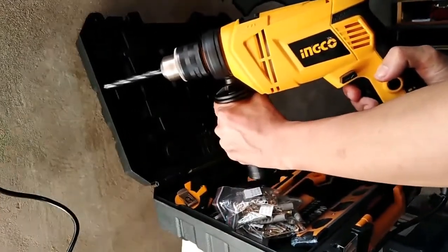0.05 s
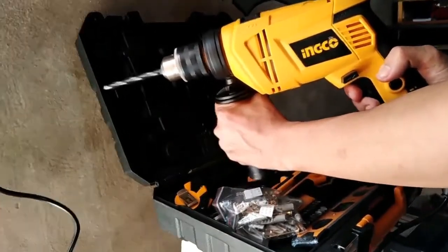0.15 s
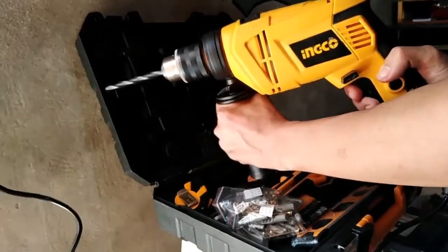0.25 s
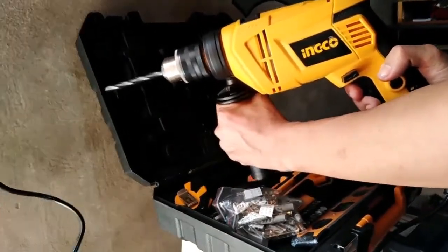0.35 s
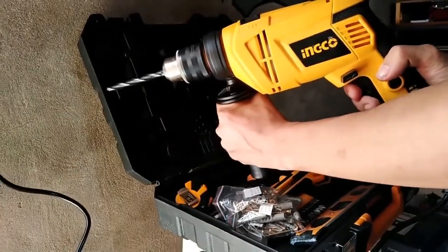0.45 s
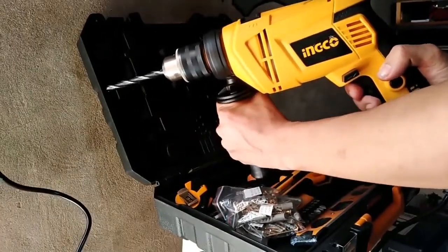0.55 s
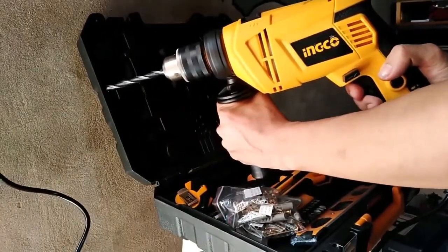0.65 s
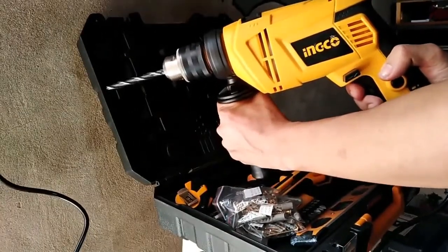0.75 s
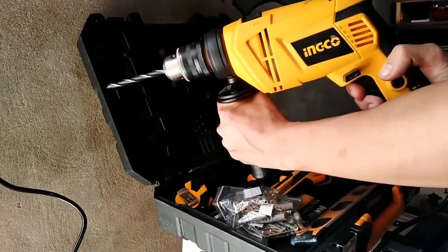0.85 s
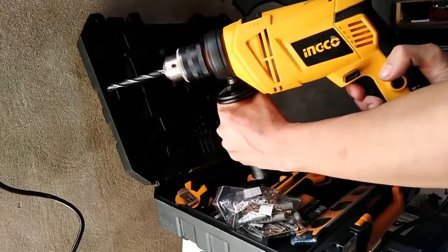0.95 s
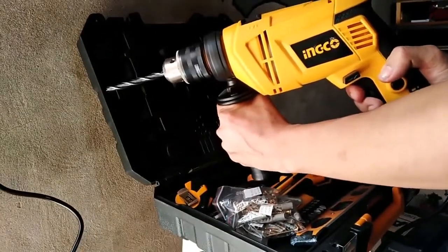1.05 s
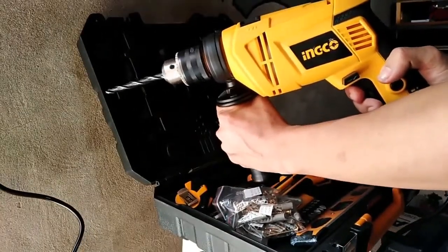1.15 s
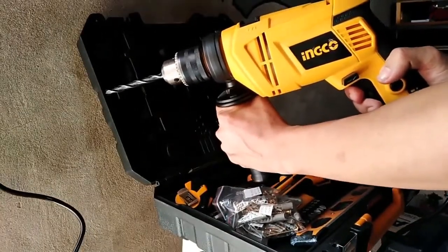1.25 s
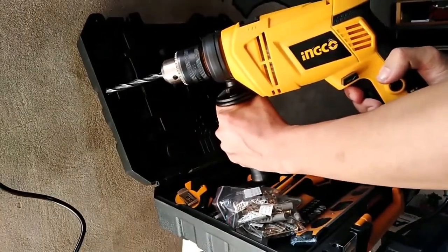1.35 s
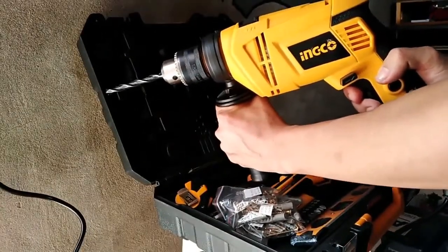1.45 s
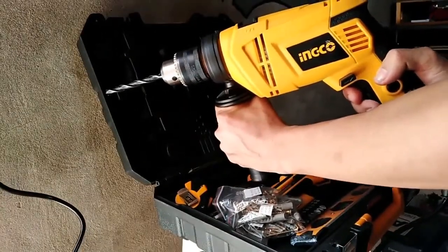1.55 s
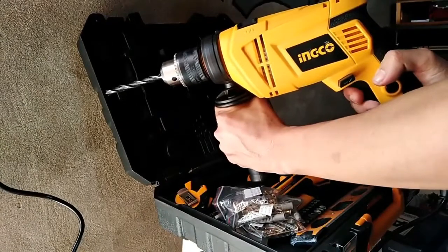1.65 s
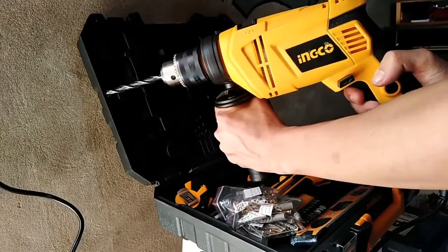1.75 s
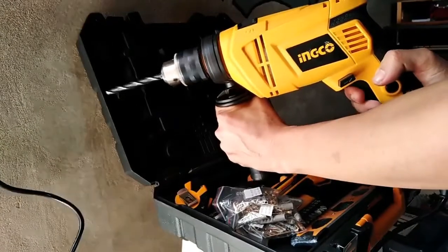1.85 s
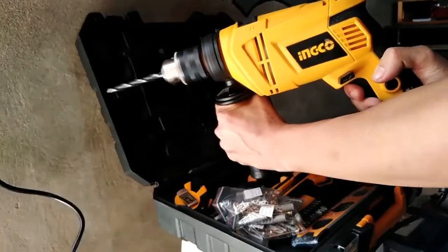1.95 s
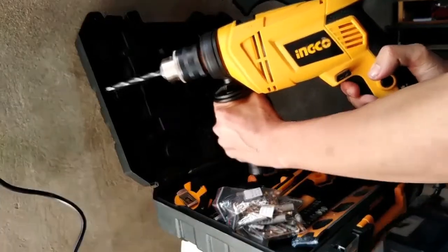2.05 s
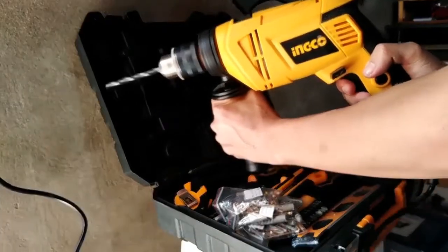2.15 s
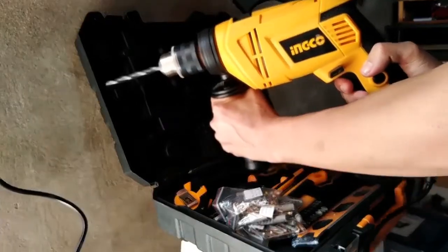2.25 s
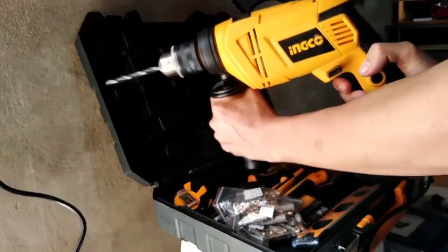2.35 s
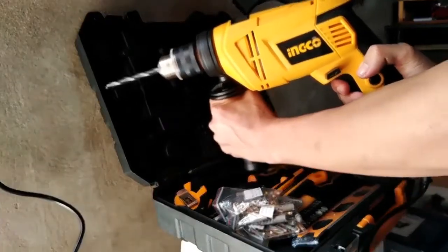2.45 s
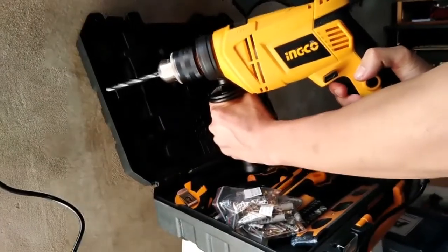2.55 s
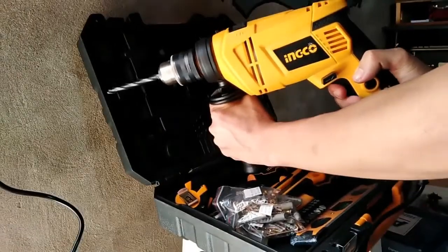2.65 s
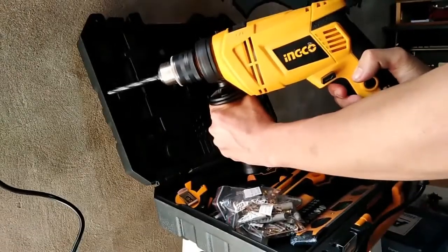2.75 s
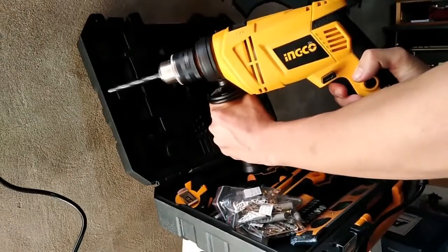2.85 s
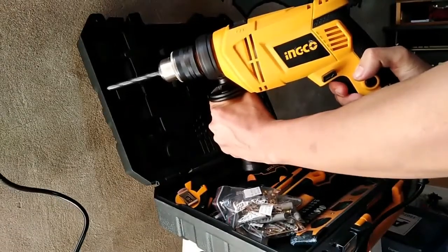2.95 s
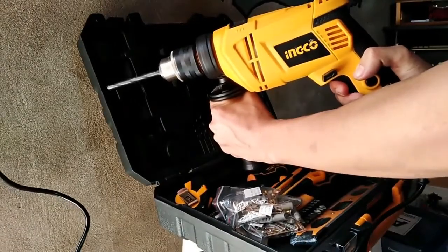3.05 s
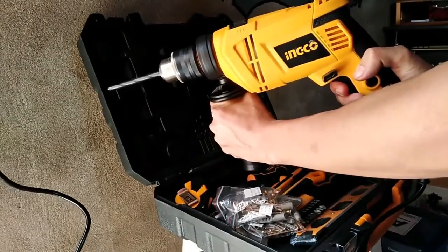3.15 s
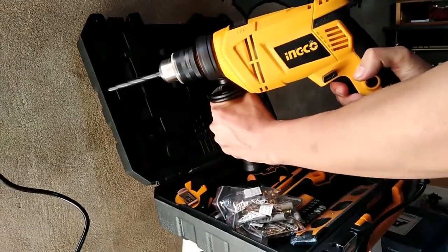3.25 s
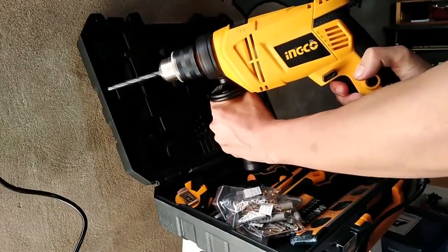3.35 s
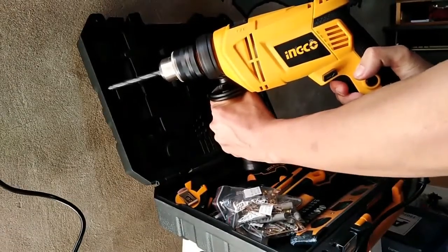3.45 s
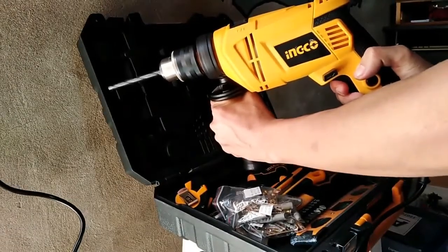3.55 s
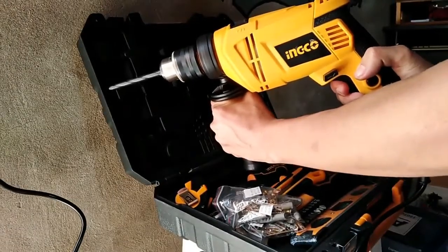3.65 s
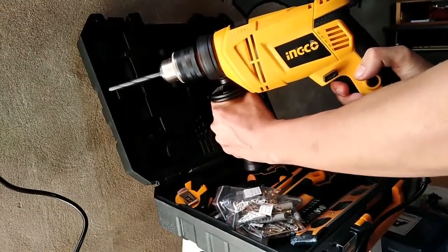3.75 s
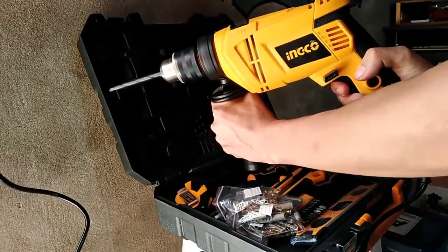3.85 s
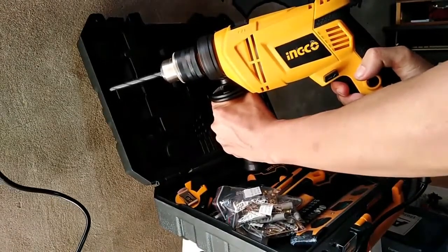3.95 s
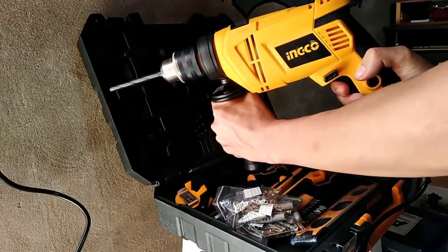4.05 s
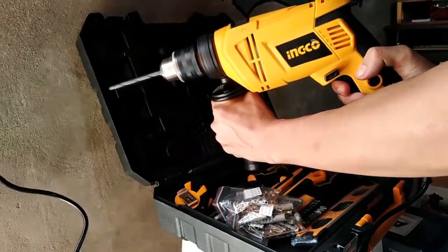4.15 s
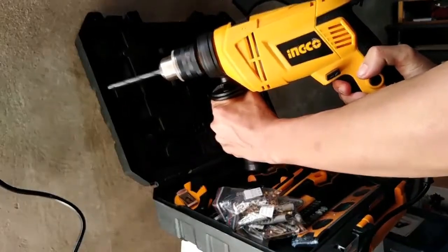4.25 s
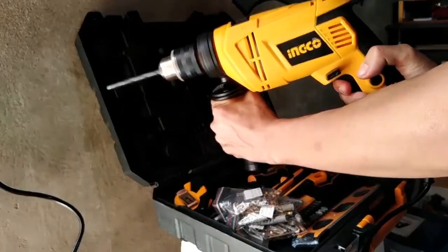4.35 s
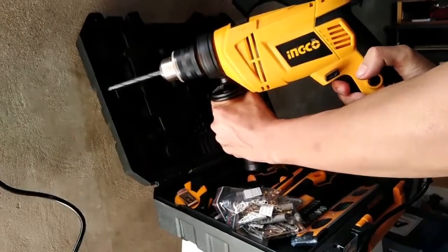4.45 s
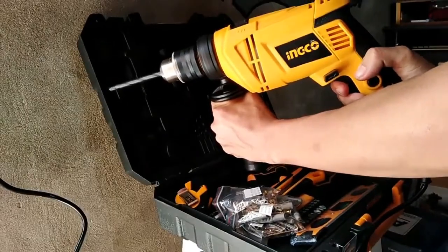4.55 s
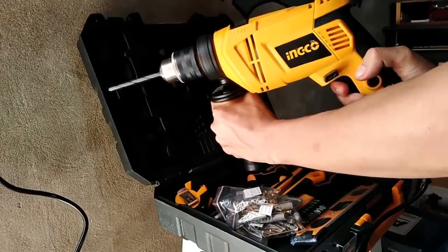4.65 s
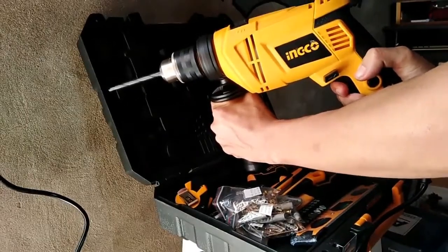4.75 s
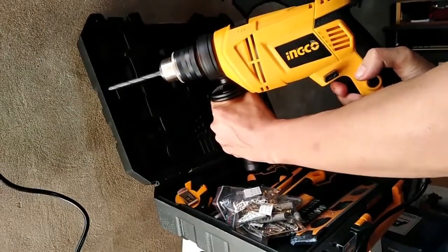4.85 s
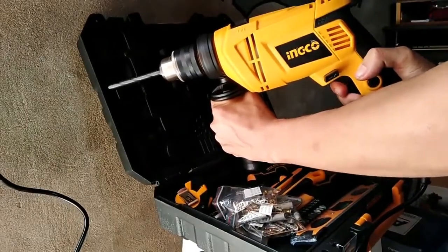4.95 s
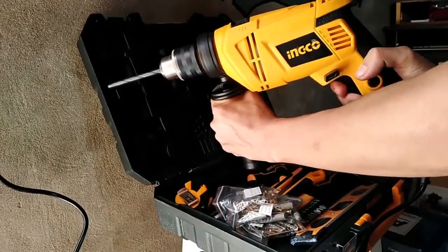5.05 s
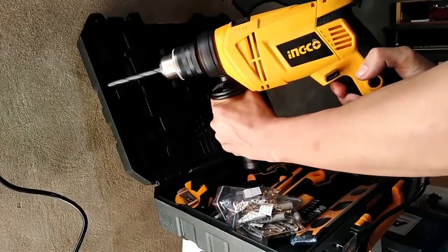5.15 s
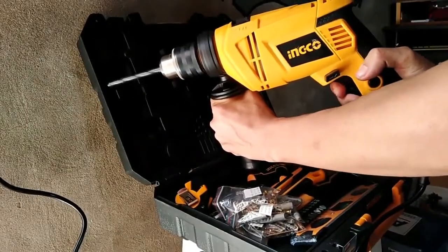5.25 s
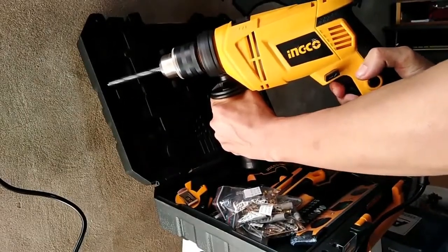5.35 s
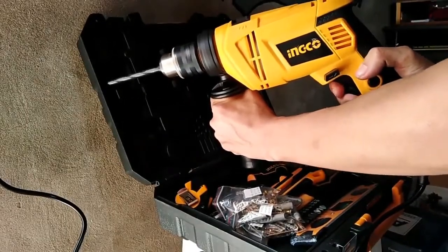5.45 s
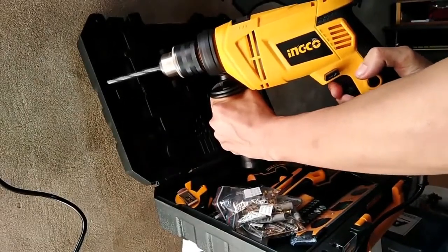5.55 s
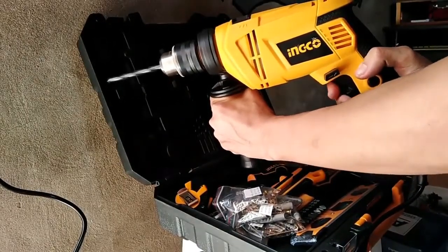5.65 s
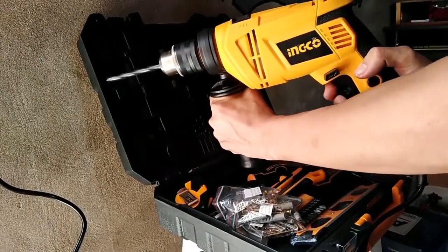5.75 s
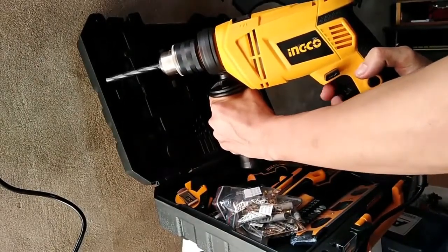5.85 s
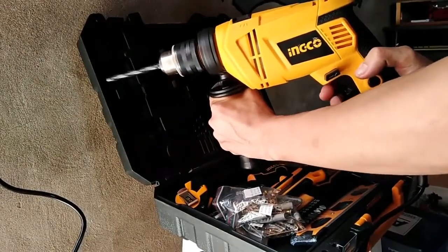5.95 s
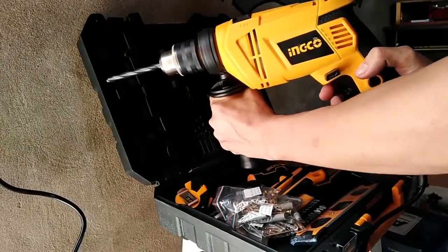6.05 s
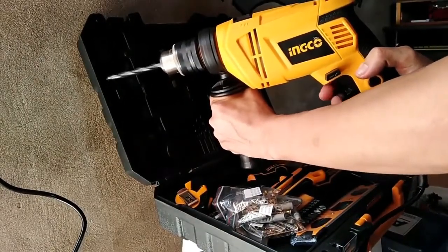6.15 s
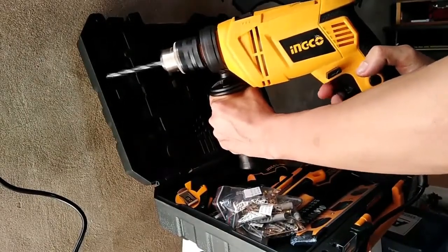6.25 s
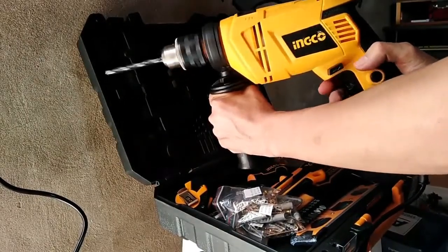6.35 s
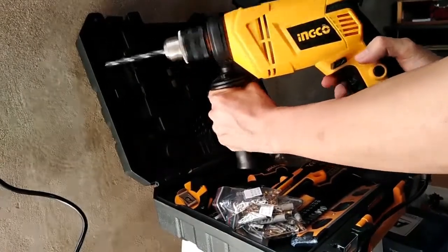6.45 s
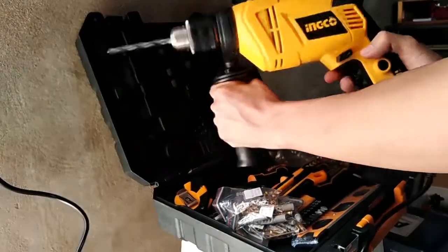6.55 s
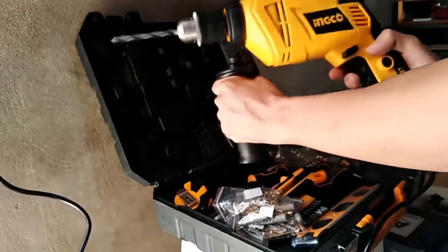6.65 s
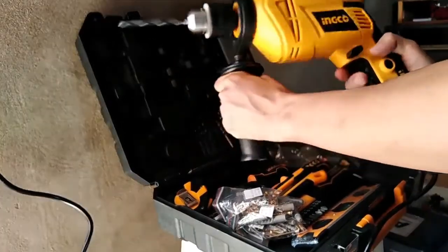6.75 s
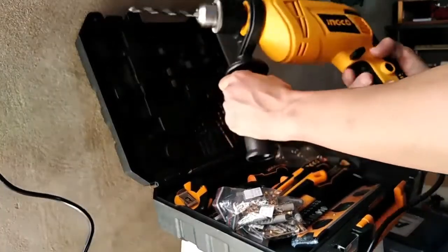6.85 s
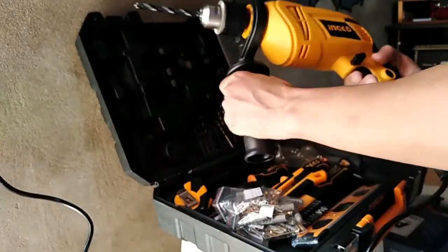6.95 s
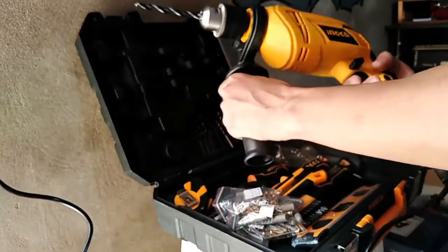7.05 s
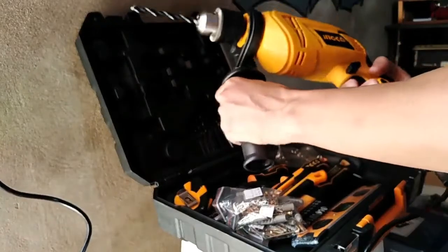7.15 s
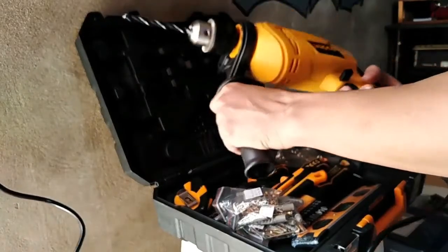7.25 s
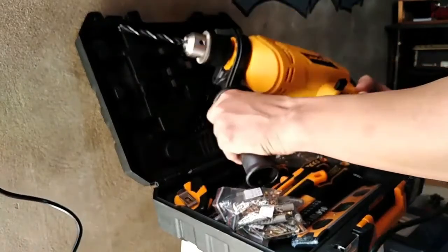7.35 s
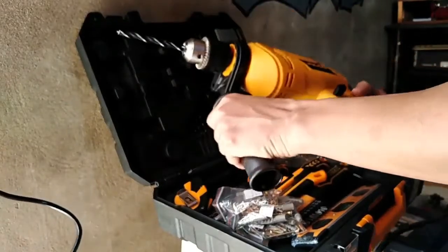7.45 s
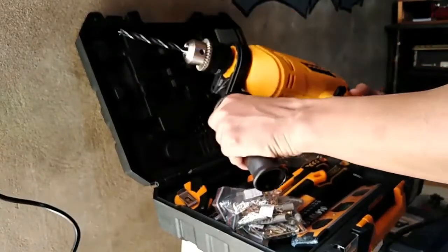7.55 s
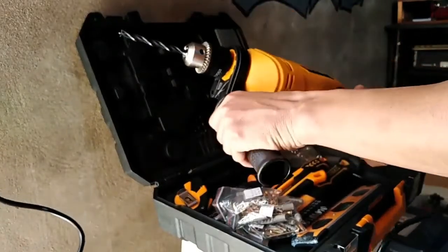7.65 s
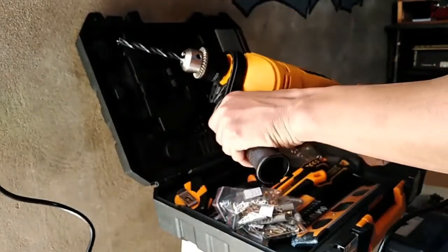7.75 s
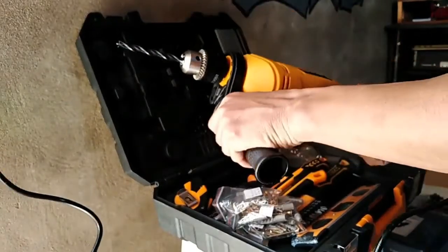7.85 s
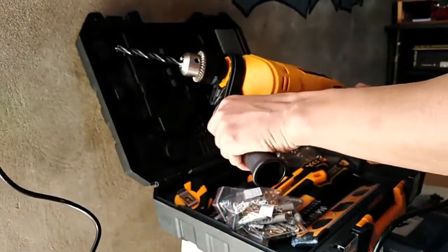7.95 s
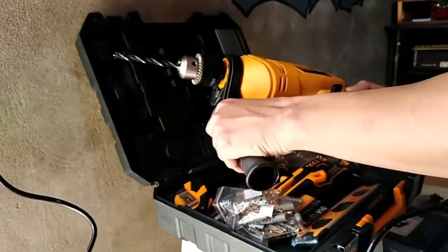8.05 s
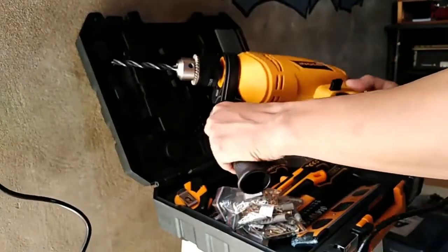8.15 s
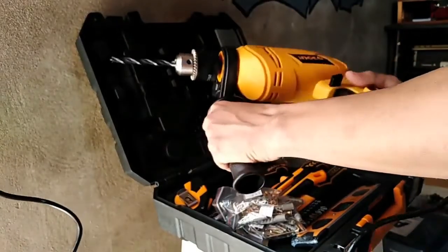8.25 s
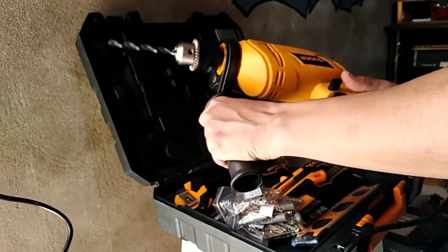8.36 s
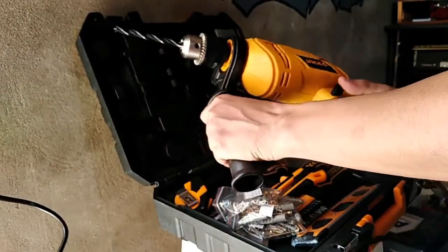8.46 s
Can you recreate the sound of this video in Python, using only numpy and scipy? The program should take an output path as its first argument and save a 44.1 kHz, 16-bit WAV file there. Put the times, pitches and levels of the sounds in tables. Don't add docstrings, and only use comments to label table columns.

```python
import sys
import numpy as np
from scipy import signal
from scipy.fft import rfft, irfft, next_fast_len
from scipy.io import wavfile
from scipy.ndimage import uniform_filter1d, map_coordinates

SR = 44100
rng = np.random.default_rng(int(sys.argv[2]) if len(sys.argv) > 2 else 0)


def store_pcm(level_fs):
    pcm = np.round(np.clip(level_fs, -1, 1) * 32767).astype(np.int16)
    wavfile.write(sys.argv[1], SR, np.atleast_2d(pcm).T)


def gain_from_decibels(decibels):
    exponent = np.asarray(decibels, float) / 20
    return 10 ** exponent


N = 375732
TIME = np.arange(N) / SR

# start_s, start_hz, goal_hz, time_constant_s, curve_shape
TRIGGER = [
    (0, 193.07, -264.5, 2.4745, 1),
    (1.66, 8, 14, .1, 1),
    (1.79, 13.1, 201, .4464, 1),
    (2.7, 181.65, 438.05, .2172, .8034),
    (5.093, 437.9, -186.9, 2.1266, 1),
]
# time_s, depth (0-1)
HALF_WAVE = [
    (1.65, 0.8),
    (1.8, 0.8),
    (2.0, 0.21),
    (2.6, .12),
    (2.72, 0),
]
# time_s, added_db
BRUSH_CURRENT = [(1.655, 1), (1.66, 7), (1.696, 7), (1.702, 19.5), (1.8, 15.5), (1.9, 6.5), (2.1, 5.5),
                 (2.25, 9.5), (2.45, 7.5), (2.64, 8.5), (2.72, 11.5), (3.0, 7), (3.6, 6), (4.3, 3),
                 (5.08, 1.5), (5.14, 0)]
# speed_hz, hiss_db, gear_db, unbalance_db
COASTING = [(0, -100, -100, -110), (8, -76, -75, -100), (20, -62, -63, -95), (40, -51, -57, -90),
            (70, -41, -52.5, -81), (105, -36.5, -46, -62), (143, -33.5, -42, -68), (192, -28, -35, -48),
            (270, -20, -30.5, -38.5), (360.6, -16, -29.5, -42), (437, -15, -28.5, -39)]
# speed_hz, fan_db, fan_octave_db, commutator_db, overtones_db
TONES = [(10, -100, -100, -85, -83.5), (65, -70, -71, -56, -54), (85, -67, -68, -43, -47),
         (105, -67, -62, -41, -41), (130, -66, -54, -35.5, -39.5), (160, -66.5, -48, -35, -39),
         (195, -57, -37.5, -35.5, -36.5), (225, -55, -26, -45, -44), (265, -36, -27.5, -42, -44),
         (315, -33.5, -28, -50, -50), (355, -20.5, -32, -44, -44), (400, -16.5, -33, -46, -46),
         (438, -19.5, -36, -43, -43)]
TONE_LOAD = (.2, .2, .9, 0.91)
# shaft_multiple, level_db
BARS = [(23, -12), (24, -1), (25, -12), (45, -10), (46, -7), (47, -3), (48, -1), (49, -8), (69, -11),
        (70, -8), (71, -8), (72, -7), (96, -13)]
# centre_hz, width_hz, lift_db
PORTS = [(8396, 1280, 12.5), (6956, 820, 14)]
# freq_hz, density_db
HISS = [(500, -37.5), (2000, -17), (4000, 1), (6000, 2.5), (9000, -2), (11000, -4), (14000, -8),
        (16000, -3.5)]
# freq_hz, density_db
GEARS = [(180, -28.5), (300, -6.5), (323, -8.5), (426, -6), (508, -5.5), (999, 0), (1870, 2), (3370, 2.5),
         (4070, -5.5), (6000, -13.5), (7800, -34.5), (13200, -120)]
# freq_hz, density_db
BACKLASH = [(500, -12), (800, -4), (1100, -1), (1500, 1), (2000, -4.5), (2900, -3.5), (3700, -16)]
# freq_hz, density_db
CHUCK = [(740, -30), (785, -6), (800, 3), (815, -8), (860, -30)]
# freq_hz, density_db
COIL = [(300, -24), (430, -3), (520, 0), (650, -8.5), (900, -26)]
# freq_hz, density_db
AIR = [(15, -63), (25, -24), (279, -6), (361, -17), (432, -9), (509, -8), (900, -16.5), (1170, -41),
       (1980, -120)]
# freq_hz, gain_db
CASING = [(40, -24), (120, -7), (200, 0), (1200, -6), (1800, -8), (2050, 1), (2480, 6), (2800, -1),
          (3400, -4), (4600, -10), (6000, -1), (9500, -3), (11500, 1), (14000, 3)]
# freq_hz, t60_s
WALLS = [(100, 0.36), (1000, .16), (6000, .2), (15000, 0.065)]
# pitch_hz, level_db
HUMS = [(64.6, -73), (183.0, -75), (220.7, -74), (279.9, -77.5)]
# start_s, attack_s, hold_s, release_20db_s, level_db
LOW_SURGE = (3, 0.2, .75, 0.03, -44.5)
# freq_hz, density_db
OUTDOORS = [(18, -62), (30, -32), (53, -15), (219, -3.5), (285, -6), (310, -29.5), (388, -14.5), (549, -46),
            (660, -34), (1690, -68), (4000, -47), (5200, -73.5), (8800, -120)]
# nearest_s, width_s, level_db
PASSING = (8.1, 0.14, -62)
# start_s, length_s, start_hz, end_hz, level_db
CHIRPS = [
    (1.325, 0.22, 5500, 5430, -66),
    (1.5, 0.18, 5200, 6100, -68),
    (7.548, .3, 5810, 5400, -71),
    (7.9, 0.15, 5600, 3800, -72),
    (7.93, .2, 7500, 7000, -81),
    (8.0, .3, 4400, 3310, -76),
    (8.21, .15, 7600, 7400, -71),
    (8.31, 0.25, 6100, 5240, -65),
]
# start_s, peak_db, ring_hz, tick_db
KNOCKS = [(1.662, -61, 3210, 9), (1.681, -57, 544, 15), (1.703, -39, 1530, -1), (1.721, -46, 501, -8),
          (1.739, -35, 1520, -17), (1.761, -49, 3090, -11), (1.779, -50, 3090, -11),
          (1.841, -28, 1190, -14), (1.859, -32, 1600, -14.5), (1.866, -32, 3060, -15),
          (1.885, -26, 2600, -12), (1.998, -24, 2980, -12), (2.202, -20, 3150, -14),
          (2.296, -18.5, 1600, -10), (2.527, -15.5, 1580, -5), (7.668, -61, 627, -14),
          (8.461, -41, 2510, -0.5), (8.464, -51, 2550, 0.5), (8.479, -40.5, 2200, 3.5),
          (8.488, -54, 2020, -10)]
# freq_hz, density_db
FLOOR = [(300, -18), (450, -1), (800, -10), (1350, -13), (1700, -26.5), (3500, -24), (5200, -14),
         (7500, -20), (10000, -25)]
# time_s, overflow_level (full scale near 1
HEADROOM = [(2.6, .5), (3.1, .6), (3.6, .6), (3.86, .6), (3.92, .8), (4.22, .8), (4.3, 1.5)]
# freq_hz, limit_db
STARVED = [(2300, -30), (2800, -13), (3800, -12), (4700, -9.5), (5300, -30), (9800, -21), (11000, -15.5),
           (12000, -16), (14000, -18), (16000, -22)]

BLADES, MAINS_HZ, TOP_HZ = 18, 50, 15750


def unit(x):
    return x / np.sqrt(np.mean(x ** 2) + 1e-20)


def curves(rows):
    s, *cols = np.transpose(rows)
    return [np.interp(TIME, s, c) for c in cols]


def by_speed(rows, speed_hz):
    hz, *cols = np.transpose(rows)
    return [np.interp(speed_hz, hz, c) for c in cols]


def wobble(rate_hz):
    knots = rng.standard_normal((2, N // 100))
    return np.array([map_coordinates(k, [TIME * rate_hz], order=3) for k in knots])


def pair(alike):
    a, b = rng.standard_normal((2, N))
    turn = np.arccos(np.clip(alike, 0, 1)) / 2
    return np.cos(turn) * a + np.sin(turn) * b * [[1], [-1]]


def filtered(x, response):
    m = next_fast_len(N + 8192)
    return irfft(rfft(x, m) * response(np.fft.rfftfreq(m, 1 / SR)), m)[..., :N]


def colour(points):
    f, db = np.transpose(points)
    return lambda hz: gain_from_decibels(np.interp(np.log(hz + 1), np.log(f), db, -120, -120))


def patchy(x, patchy_db):
    z = signal.stft(x, nperseg=512)[2]
    field = uniform_filter1d(rng.standard_normal(z.shape), size=4, axis=1)
    field = uniform_filter1d(field, size=12, axis=2)
    return unit(signal.istft(z * gain_from_decibels(patchy_db * unit(field)), nperseg=512)[1][:, :N])


def ports(hz):
    return np.array([1 + gain_from_decibels(db) * 1j * hz * w / (c * c - hz * hz + 1j * hz * w) for c, w, db in PORTS])


def room(x, wet_db):
    hz, t, z = signal.stft(rng.standard_normal((2, SR // 2)), SR, nperseg=256)
    f, t60 = np.transpose(WALLS)
    decay = gain_from_decibels(-60 * t / np.interp(hz, f, t60)[:, None])
    tail = signal.istft(z * decay, SR, nperseg=256)[1]
    tail = tail / np.linalg.norm(tail, axis=1, keepdims=True)
    wet = signal.fftconvolve(np.pad(x, ((0, 0), (130, 0))), tail, axes=1)[:, :N]
    return (x + gain_from_decibels(wet_db) * wet) / np.sqrt(1 + gain_from_decibels(wet_db) ** 2)


def armature():
    finger_s = 0.04
    speed_hz = np.zeros(N)
    for s, start_hz, goal_hz, tau_s, shape in TRIGGER:
        run = goal_hz + (start_hz - goal_hz) * np.exp(-(np.clip(TIME - s, 0, None) / tau_s) ** shape)
        speed_hz = np.where(TIME >= s, np.maximum(run, 0), speed_hz)
    return uniform_filter1d(speed_hz, size=round(finger_s * SR), mode="nearest")


def tooth_contacts(speed_hz, spark_db):
    share, slow_share, slack_hz = 0.25, 0.32, 162
    rattle = share + slow_share * (spark_db > 0) * (speed_hz < slack_hz) + 0.18 * wobble(6)[0]
    hits = gain_from_decibels(4 * rng.exponential(size=N)) * (rng.random(N) < 0.02)
    hits = np.minimum(uniform_filter1d(hits, size=24), 0.4)
    return 1 + np.clip(rattle, 0, 1) * unit(hits)


def brush_hiss(angle, teeth):
    beat = 1 + 0.25 * np.cos(angle) + 0.3 * np.cos(24 * angle)
    scrape = unit(beat * teeth ** 0.54 * pair(0.24))
    hiss = unit(filtered(scrape, lambda hz: colour(HISS)(hz) * ports(hz)))
    return patchy(hiss, patchy_db=1.3)


def gear_noise(teeth):
    gears = unit(filtered(teeth * pair(0.7), colour(GEARS))) * gain_from_decibels(1.46 * wobble(12))
    return patchy(gears, patchy_db=2.5)


def gear_slack(speed_hz, spark_db, teeth):
    level = gain_from_decibels(-5 - 6 * spark_db + 2 * wobble(7)) * np.clip(speed_hz / 250, 0.7, 1)
    return level * unit(filtered(teeth * pair(0.6), colour(BACKLASH)))


def cooling_air():
    return unit(filtered(pair(0.22), colour(AIR))) * gain_from_decibels([[-1], [1]])


def shaft_tones(speed_hz, angle, spark_db, shake_db, gear_db):
    levels = by_speed(TONES, speed_hz)
    fan_db, octave_db, bar_db, upper_db = [db + share * spark_db for db, share in zip(levels, TONE_LOAD)]

    def tone(order, db, rough_db, rate_hz):
        port = ports(order * speed_hz)
        gain = abs(port) * colour(CASING + [(TOP_HZ, -40)])(order * speed_hz + 40)
        level = gain_from_decibels(db + rough_db * wobble(rate_hz)) * gain
        return level * np.sin(order * angle + np.angle(port) + rough_db / 4 * wobble(rate_hz))

    tones = tone(1, shake_db + 0.4 * spark_db + 2.5, 1.2, 20)
    tones += tone(4, gear_db - 17, 3, 60)
    tones += tone(BLADES, fan_db - 4.5, 0.96, 30)
    for side, db in [(-1, -9), (0, 0.5), (0.88, -2.5)]:
        tones += tone(2 * BLADES + side, octave_db + db - 3, 4, 160)
    for order, db in BARS:
        base_db = bar_db if order < 30 else upper_db
        tones += tone(order, base_db + db - 8 + 3 * wobble(11), 5, 170)
    return tones


def chuck_ring(speed_hz, spark_db, teeth):
    crawl_hz = 75
    level = gain_from_decibels(-13) * np.clip(1 - speed_hz / crawl_hz, 0, 0.5) * 2 * (spark_db < 1)
    return level * unit(filtered(teeth * pair(0.6), colour(CHUCK)))


def coil_buzz(depth, burst):
    return gain_from_decibels(1.5) * depth * burst * unit(filtered(pair(0.8), colour(COIL)))


def drill():
    speed_hz = armature()
    angle = 2 * np.pi * np.cumsum(speed_hz) / SR
    spark_db, = curves(BRUSH_CURRENT)
    hiss_db, gear_db, shake_db = by_speed(COASTING, speed_hz)
    hiss_db = hiss_db + spark_db
    gear_db = gear_db + 1.11 * spark_db + 0.8 * wobble(5)[0]
    air_db = -28.5 + 0.79 * (hiss_db - 0.8 * spark_db) + 3 * wobble(8)[0]
    teeth = tooth_contacts(speed_hz, spark_db)
    burst = np.exp(2.9 * (np.cos(2 * np.pi * MAINS_HZ * (TIME - 1.663)) - 1))
    depth = np.interp(TIME, *np.transpose(HALF_WAVE), 0, 0)
    feed = 1 + depth * (1.38 * burst - 0.7)

    gears = gear_noise(teeth) + gear_slack(speed_hz, spark_db, teeth)
    gears = gears + chuck_ring(speed_hz, spark_db, teeth) + coil_buzz(depth, burst)
    noise = gain_from_decibels(hiss_db - 0.95 + 1.1 * wobble(14)) * brush_hiss(angle, teeth) + gain_from_decibels(gear_db - 0.4) * gears
    air = gain_from_decibels(np.minimum(air_db, gear_db - 7) - 5.5) * cooling_air() * (speed_hz > 20)
    tones = shaft_tones(speed_hz, angle, spark_db, shake_db, gear_db)
    return room(feed * noise, wet_db=-4) + air + room(tones, wet_db=-9.5)


def rumble_and_wind():
    building_db, buffet_db, top_speed_hz = -76, -57, 438
    s, attack_s, hold_s, release_s, db = LOW_SURGE
    fade_db = 20 * np.clip(TIME - s - attack_s - hold_s, 0, None) / release_s
    surge = gain_from_decibels(db - fade_db) * np.clip((TIME - s) / attack_s, 0, 1)
    buffet = gain_from_decibels(buffet_db) * (armature() / top_speed_hz) ** 4 + surge
    level = gain_from_decibels(building_db) + buffet * gain_from_decibels(2.5 * wobble(6))
    low = colour([(22, -21), (40, -11), (66, -4.5), (100, -2), (170, -15.0)])
    out = level * [[0.85], [1.15]] * unit(filtered(pair(0.05), low))
    for hz, db in HUMS:
        out += gain_from_decibels(db + 3.5 + 2.2 * wobble(7)) * np.sin(2 * np.pi * hz * TIME + 0.6 * wobble(13))
    return out


def traffic():
    traffic_db = -74.5
    s, width_s, db = PASSING
    swell = np.exp(-((TIME - s) / width_s) ** 2)
    level = (gain_from_decibels(traffic_db) + gain_from_decibels(db) * swell) * gain_from_decibels(3.5 + 2.5 * wobble(12)[0])
    muffled = filtered(pair(0.05), lambda hz: colour(OUTDOORS)(hz) * (hz > 85) / (1 + (hz / 1500) ** 4))
    tyres = colour([(350, -6), (550, 1), (800, -3), (1300, -12), (1600, -30)])
    return level * unit(muffled) + gain_from_decibels(db - 15) * swell * unit(filtered(pair(0.3), tyres))


def chirps():
    width = 0.25
    out = np.zeros((2, N))
    for s, length_s, start_hz, end_hz, db in CHIRPS:
        u = np.clip((TIME - s) / length_s, 0, 1)
        low = rng.standard_normal((2, N))
        fuzz = unit(filtered(low, lambda hz: np.exp(-(2 * hz / (width * start_hz)) ** 2)))
        glide = np.sin(2 * np.pi * np.cumsum(start_hz + (end_hz - start_hz) * u) / SR)
        out += gain_from_decibels(db + 5 * wobble(30)) * np.sin(np.pi * u ** 0.87) * fuzz * glide
    return out


def knocks():
    dull, bright = np.zeros((2, 2, N + SR))
    t = np.arange(SR // 5) / SR
    for s, db, hz, tick_db in KNOCKS:
        grit = rng.standard_normal((2, 2, len(t)))
        at = round(s * SR)
        ring = signal.lfilter(*signal.iirpeak(hz, 6, SR), grit[0])
        dull[:, at:at + len(t)] += gain_from_decibels(db - 3.5 - 60 * t / (0.02 + 5 / hz)) * unit(ring)
        bright[:, at:at + len(t)] += gain_from_decibels(db + tick_db - 60 * t / 0.022) * grit[1]

    def tick(hz):
        return ports(hz) * gain_from_decibels(-7) * hz / (hz - 5000j) / (1 + (hz / 10000) ** 4)

    return dull[:, :N] + filtered(bright[:, :N], tick)


def stop_thud():
    t = np.clip(TIME - 7.662, 0, 1)
    thud = filtered(pair(0.5), colour([(250, -6), (600, 3), (1500, -3), (3000, -15)]))
    return 3 * gain_from_decibels(-60 - 60 * t / 0.31) * (t > 0) * thud


def scene():
    near = drill() + room(knocks() + stop_thud(), wet_db=-2.5)
    near[0] = np.roll(near[0], 2)
    far = rumble_and_wind() + traffic() + chirps()
    return near + far + gain_from_decibels(-80.5) * patchy(filtered(pair(0.2), colour(FLOOR)), patchy_db=4)


def starved(x):
    streak_db = 2.5
    hz, _, z = signal.stft(x, SR, nperseg=2048)
    power = np.mean(abs(z[:, :-1].reshape(2, -1, 8, z.shape[-1])) ** 2, axis=(0, 2))
    whine = uniform_filter1d(np.median(power[32:54], axis=0), size=5)
    luck = unit(uniform_filter1d(rng.standard_normal(power.shape), size=4))
    limit = colour(STARVED)(hz[4::8])[:, None] * gain_from_decibels(2.5 * luck + 1.8)
    streaks = uniform_filter1d(rng.standard_normal(z.shape), size=2, axis=1)
    streaks = unit(uniform_filter1d(streaks, size=4, axis=2))
    z *= gain_from_decibels(streak_db * (hz > 480)[:, None] * streaks - 0.69)
    z[:, :-1] *= np.repeat(power > limit ** 2 * whine, 8, axis=0)
    return signal.istft(z, SR, nperseg=2048)[1][:, :N]


def band_limit(x):
    return signal.sosfilt(signal.butter(12, 15740, fs=SR, output="sos"), x)


def record(dry):
    mic_hz = 14250
    top, = curves(HEADROOM)
    x = filtered(dry, lambda hz: 1 / (1 + (hz / mic_hz) ** 80))
    crackle = np.clip((abs(x) - top) / 0.083, 0, 1) * rng.standard_normal(x.shape)
    x = starved(x + gain_from_decibels(-4.5) * crackle)
    limited = x / (1 + abs(x / 0.8) ** 6) ** (1 / 6)
    mix = filtered(limited, lambda hz: hz < TOP_HZ)
    return band_limit(mix)


dry = scene()
out = record(dry)
store_pcm(out)
```